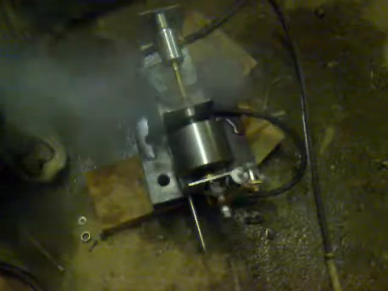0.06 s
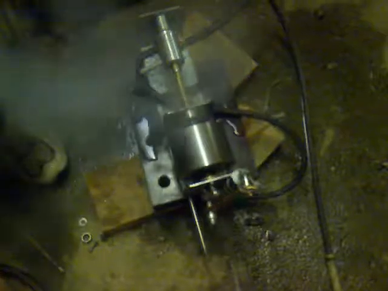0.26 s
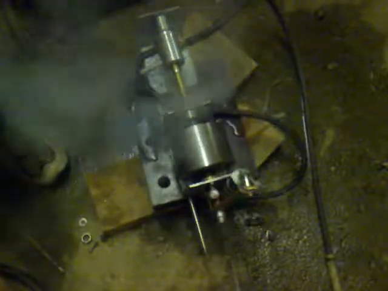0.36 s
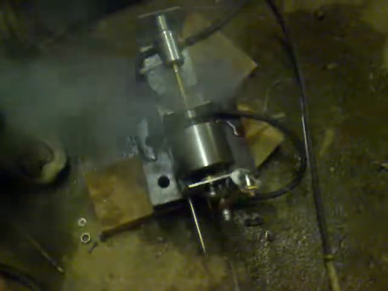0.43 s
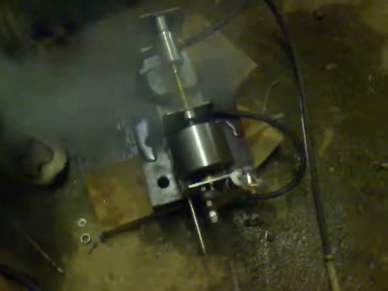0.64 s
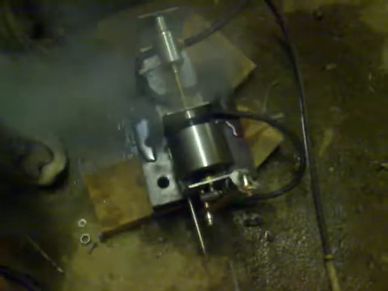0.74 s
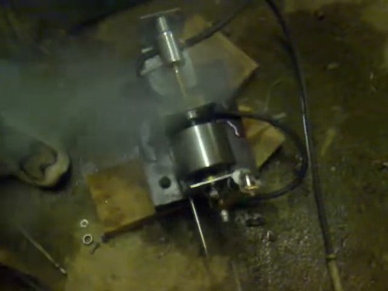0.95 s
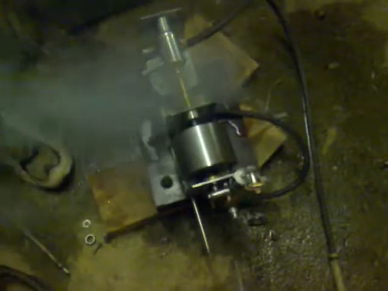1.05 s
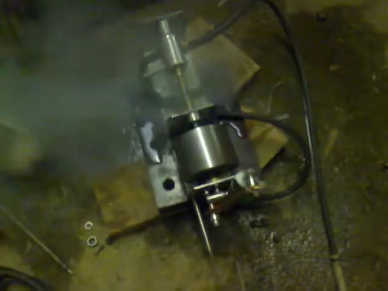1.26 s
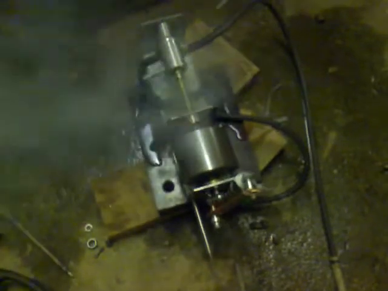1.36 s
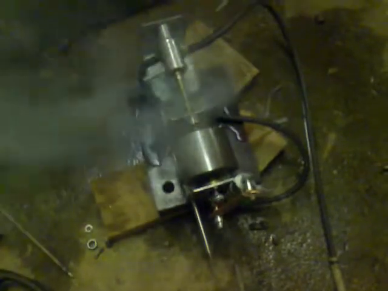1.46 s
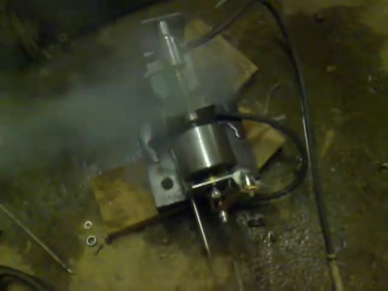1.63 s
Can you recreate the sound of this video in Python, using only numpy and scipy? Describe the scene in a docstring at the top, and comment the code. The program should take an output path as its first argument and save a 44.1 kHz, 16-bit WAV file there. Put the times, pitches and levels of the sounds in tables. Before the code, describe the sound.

A small steam engine turns over slowly, releasing three sharp, evenly spaced puffs of steam with a whistling edge. A thin leaking hiss and soft rod scuffs fill the gaps, heard close up in a slightly reverberant workshop.

```python
"""A small steam engine

A single cylinder turns over slowly on a workshop floor, heard in mono from close above. At each turn the
exhaust valve releases a sharp puff: a bright turbulent jet, a wavering whistle that sags as the pressure
falls, a low rush and a soft thump. The pipe sings on as the cylinder empties. Between puffs steam leaks
and the piston rod scuffs; the valve gear knocks once. A faint hum and the room's reverberation lie behind."""
import sys
import numpy as np
from scipy import signal
from scipy.fft import rfft, irfft
from scipy.io import wavfile

SR = 44100
rng = np.random.default_rng(int(sys.argv[2]) if len(sys.argv) > 2 else 0)


def master_out(mix):
    """Clip the mix to full scale and print it as 16-bit PCM to the path in sys.argv[1]."""
    frames = np.transpose(np.atleast_2d(mix))
    ceiling = np.clip(frames, -1, 1)
    pcm = np.round(ceiling * 32767).astype(np.int16)
    wavfile.write(sys.argv[1], SR, pcm)


N = 74970
T = np.arange(N) / SR

# The workshop's hum. Each row: time in seconds, pitch in Hz, level in dB.
HUM_COURSE = [(.1, 410, -69.5), (.42, 412, -61.5), (.62, 440, -61), (.72, 420, -58), (.84, 425, -50.5),
              (.92, 450, -54), (1.05, 425, -67), (1.2, 420, -64), (1.451, 412, -57), (1.55, 420, -76),
              (1.7, 430, -77)]
# Narrow resonances of the pipework. Each row: frequency in Hz, bandwidth in Hz, added gain.
PIPE_RESONANCES = [(435, 12, 0.23), (1950, 83, 0.34), (2730, 20, 0.55), (3325, 42, .7), (3340, 8.7, 0.31),
                   (3710, 36, 2.1), (4090, 30, 1.5), (4660, 16, 0.51), (5220, 49, 1.07), (5330, 15, 0.64),
                   (5980, 26, 1.2), (5960, 23, 0.33), (6220, 32, 0.89), (6085, 24, 1.1), (6500, 16, 1.6),
                   (6830, 29, 1.5), (7650, 68, 0.69), (8120, 27, 0.61), (9920, 60, 0.8), (11560, 85, 0.44)]
# Scuffs of the piston rod. Each row: centre in seconds, level in dB, half length in seconds.
ROD_SCUFFS = [(0.114, -35.5, 0.024), (.559, -34.5, 0.022), (1.04, -42, 0.027), (1.104, -38.5, 0.019),
              (1.571, -42, 0.03), (1.673, -42, 0.0094)]
# Exhaust puffs. Each row: start in seconds, level in dB, seconds until the valve closes,
# seconds until the return stroke ends, extra level of the low rush in dB.
EXHAUST_PUFFS = [(.2255, 0.55, 0.14, 0.357, 0.5), (.7205, -0.5, 0.15, 0.436, 1),
                 (1.2715, 0.74, 0.164, 0.46, 1)]
# Tones that steam draws from the pipe. Each row: frequency in Hz, relative level in dB.
PIPE_PARTIALS = [(3304, 1.5), (3435, -0.5), (3680, -3.5), (4095, -9.5)]
# Knocks of the valve gear. Each row: start in seconds, level in dB.
GEAR_KNOCKS = [(1.0425, -32)]
# Modes of the valve gear. Each row: frequency in Hz, relative level in dB, seconds to fall 60 dB.
GEAR_MODES = [(1920, -6.5, 0.13), (2410, -2, .10), (2590, 2, 0.03), (2950, -5, 0.016), (5260, -9, 0.075)]

# Spectra of the noise sources. Each row: frequency in Hz, relative spectral density in dB.
ROOM_SPECTRUM = [(20, -15), (60, -12), (120, -8), (180, -1), (280, 1), (360, -6), (600, -2), (1200, -5),
                 (3000, -14)]
LEAK_SPECTRUM = [(20, -22), (100, -33), (200, -14.5), (420, -29), (700, -12.5), (1500, -11), (2300, -1.5),
                 (3400, 6), (4200, 1.5), (4900, -4.5), (6200, 3), (7200, -5.5), (9500, -0.5), (12000, -5),
                 (13500, -4.5), (16000, -22)]
SCUFF_SPECTRUM = [(60, -51), (300, -8), (520, -3), (690, 10.5), (950, 1.5), (1400, 2), (2000, 4.5),
                  (3500, 3), (6000, 5.5), (8800, 9), (11000, -3), (15500, -7)]
SPIT_SPECTRUM = [(800, -23), (1700, -12), (2200, -5), (3400, 3), (4500, -6), (7000, -11), (9800, -4.5),
                 (12000, -5), (13500, 3), (16000, -6)]
JET_SPECTRUM = [(500, -22.5), (1600, -21), (2200, -10.5), (3400, -4.5), (4800, -0.5), (5400, 4.5),
                (6500, 1), (7200, 2), (7800, 1.5), (9000, -1.5), (10000, -2), (12200, -6.5), (13500, -4),
                (14000, -11), (16000, -16.5)]
RUSH_SPECTRUM = [(100, -37), (250, -12.5), (430, -2), (800, 0), (1300, 2), (2200, 1), (5000, -0.5),
                 (12000, -46)]
THUMP_SPECTRUM = [(20, -8), (45, -8), (75, 8), (130, -6), (250, -5), (600, -14)]
RETURN_SPECTRUM = [(150, -19), (300, -5), (700, -7.5), (1500, 0), (2200, 0.5), (3300, 7.5), (4900, 0.5),
                   (6100, 7.5), (7300, -1.5), (8800, 6), (10200, 3), (12000, -2), (13500, 1), (14200, -8),
                   (16000, -6.5)]
PIPE_SPECTRUM = [(300, -39), (1600, -21.5), (2100, -6), (2700, -4.5), (2950, -6), (3350, -9), (4100, -4.5),
                 (4900, -4.5), (6000, -6), (8000, -12.5), (15000, -15)]
AFTERBLOW_SPECTRUM = [(800, -17.5), (1700, -20), (2200, -6), (2700, 4), (2950, 1.5), (3350, 5),
                      (3900, -0.5), (4400, -1), (4900, -30), (7000, -22), (15000, -35)]
TAP_SPECTRUM = [(400, -28), (1200, -13), (1700, 1), (2450, 0), (3200, -8), (5000, -12), (10000, -25)]


def from_db(db):
    """Amplitude ratio for a level in decibels."""
    return 10 ** (np.asarray(db) / 20)


def unit_rms(x):
    """The signal scaled to an rms of 1."""
    return x / np.sqrt(np.mean(x ** 2) + 1e-20)


def drift(rate_hz):
    """Low-passed noise: a smooth random wander with an rms of 1."""
    pole = np.exp(-2 * np.pi * rate_hz / SR)
    return unit_rms(signal.lfilter([1], [1, -2 * pole, pole * pole], rng.standard_normal(2 * N))[N:])


def noise(spectrum, flutter_db=0, flutter_hz=60):
    """Spectrally shaped noise with random amplitude modulation, at an rms of 1."""
    hz, db = np.transpose(spectrum)
    bin_hz = np.arange(N // 2 + 1) * SR / N
    gain = from_db(np.interp(np.log(bin_hz + 1), np.log(hz), db))
    coloured = irfft(rfft(rng.standard_normal(N)) * gain, N)
    return unit_rms(coloured * from_db(flutter_db * drift(flutter_hz)))


def sine(hz):
    """A tone whose phase is the integral of its changing frequency."""
    return np.sin(2 * np.pi * np.cumsum(hz) / SR)


def swell(centre_s, half_s):
    """A Gaussian envelope with standard deviation half_s."""
    return np.exp(-0.5 * ((T - centre_s) / half_s) ** 2)


def flow(attack_s, hold_s, fall_db_per_s, close_db, rush=False):
    """Envelope of the puffs: flow rises, holds, decays with the pressure and drops as the valve shuts."""
    closing_s = 0.0048
    envelope = 0
    for start, db, open_s, _, rush_db in EXHAUST_PUFFS:
        age = T - start
        opened = np.exp(2 * np.minimum(age / attack_s - 1, 0)) * np.clip(1 + age / attack_s, 0, 1)
        fall_db = fall_db_per_s * np.maximum(age - attack_s - hold_s, 0)
        closed = np.clip((age - open_s) / closing_s, 0, 1)
        envelope += opened * from_db(db + rush * rush_db - fall_db - close_db * closed)
    return envelope


def emptying(fade_s=0.088):
    """Envelope of displacement: 1 while the cylinder empties, fading as each return stroke ends."""
    return sum((T > start) * np.clip((start + end_s - T) / fade_s + 0.5, 0, 1)
               for start, _, _, end_s, _ in EXHAUST_PUFFS)


def background():
    """The noise floor of the workshop: a faint wavering hum over low broadband noise."""
    times, hz, db = np.transpose(HUM_COURSE)
    hum = sine(np.interp(T, times, hz)) * from_db(np.interp(T, times, db) + 2 * drift(14))
    return hum + from_db(-58) * noise(ROOM_SPECTRUM, flutter_db=0.1, flutter_hz=9.2)


def leak(build_db=10, build_s=0.084):
    """Turbulence of steam seeping past the valve, strongest around each opening."""
    build = sum(np.exp(-np.abs(T - start) / build_s) for start, *_ in EXHAUST_PUFFS)
    return from_db(-41.5 + build_db * build) * noise(LEAK_SPECTRUM, flutter_db=2.4, flutter_hz=52)


def pipework(steam):
    """Resonance: each mode of the pipework reinforces a narrow band of the steam's sound."""
    coloured = steam
    for hz, width_hz, gain in PIPE_RESONANCES:
        radius = np.exp(-np.pi * width_hz / SR)
        feedback = [1, -2 * radius * np.cos(2 * np.pi * hz / SR), radius ** 2]
        band = (1 - radius ** 2) / 2 * signal.lfilter([1, 0, -1], feedback, steam)
        coloured = coloured + gain * band
    return coloured


def reverberation(direct, t60_s=0.36, delay_s=0.0044, cutoff_hz=6300):
    """Diffuse reflections in the workshop decay exponentially, a little duller than the direct sound."""
    tail = rng.standard_normal(N) * from_db(-60 * T / t60_s) * (T > delay_s)
    pole = np.exp(-2 * np.pi * cutoff_hz / SR)
    tail = signal.lfilter([1 - pole], [1, -pole], tail)
    return from_db(-12.5) * signal.fftconvolve(direct, tail / np.linalg.norm(tail))[:N]


def piston_rod():
    """Sliding friction of the wet rod makes soft swells of noise."""
    rubbing = sum(from_db(db) * swell(centre_s, half_s) for centre_s, db, half_s in ROD_SCUFFS)
    return rubbing * noise(SCUFF_SPECTRUM, flutter_db=2, flutter_hz=180)


def spit(lag_s=0.014):
    """Throttling: the first steam through the narrow valve gap makes a short, bright burst."""
    burst = sum(swell(start + lag_s, half_s=0.0057) for start, *_ in EXHAUST_PUFFS)
    return from_db(-19.5) * burst * noise(SPIT_SPECTRUM, flutter_db=1, flutter_hz=140)


def exhaust(spurt_lead_s=0.0093):
    """Turbulent discharge makes a bright jet and a low rush; the air it displaces thumps."""
    # The closing valve squeezes the jet into a last spurt.
    spurt = sum(swell(start + open_s - spurt_lead_s, half_s=0.012)
                for start, _, open_s, *_ in EXHAUST_PUFFS)
    jet_flow = flow(attack_s=0.012, hold_s=0.011, fall_db_per_s=175, close_db=9.2)
    rush_flow = flow(attack_s=0.017, hold_s=0.068, fall_db_per_s=63, close_db=10.3, rush=True)
    thump_flow = flow(attack_s=0.026, hold_s=0.016, fall_db_per_s=290, close_db=3.5)
    jet_envelope = from_db(-11) * jet_flow + from_db(-28.5) * spurt
    jet = jet_envelope * noise(JET_SPECTRUM, flutter_db=0.5, flutter_hz=100)
    rush = from_db(-30.5) * rush_flow * noise(RUSH_SPECTRUM, flutter_db=0.7)
    thump = from_db(-56) * (thump_flow + 0.43 * spurt) * noise(THUMP_SPECTRUM, flutter_db=7)
    return jet + rush + thump


def whistle(start_hz=6194, sag_hz_per_s=5500, waver_hz=380):
    """An unsteady edge tone at the exhaust port; its pitch sags as the pressure falls."""
    open_for_s = np.zeros(N)
    for start, _, open_s, *_ in EXHAUST_PUFFS:
        open_for_s = np.where(T >= start, np.minimum(T - start, open_s), open_for_s)
    hz = start_hz - sag_hz_per_s * open_for_s + waver_hz * drift(230)
    tone = sine(hz) * from_db(2.6 * drift(250))
    envelope = flow(attack_s=0.013, hold_s=0.048, fall_db_per_s=257, close_db=16)
    return from_db(-15) * envelope * unit_rms(tone)


def pipe_tones(puff_db=-33, idle_db=-54):
    """Flow excites faint, unsteady pipe tones that swell with each puff and idle on the leak."""
    tones = sum(from_db(db + 3.2 * drift(26)) * sine(hz + 14 * drift(43.4)) for hz, db in PIPE_PARTIALS)
    envelope = flow(attack_s=0.012, hold_s=0.05, fall_db_per_s=85, close_db=0.5)
    return (from_db(puff_db) * envelope + from_db(idle_db)) * tones


def return_stroke():
    """Displacement: the returning piston pushes out the remaining steam in a thin hiss."""
    return from_db(-37) * emptying() * noise(RETURN_SPECTRUM)


def pipe_flow(afterblow_lag_s=0.048):
    """Turbulent flow sounds hollow in the exhaust pipe and swells once more after the valve closes."""
    envelope = flow(attack_s=0.0021, hold_s=0.036, fall_db_per_s=65.7, close_db=0.21) * emptying()
    through = from_db(-24) * envelope * noise(PIPE_SPECTRUM, flutter_db=1.5, flutter_hz=140)
    afterblow = sum(swell(start + open_s + afterblow_lag_s, half_s=0.027)
                    for start, _, open_s, *_ in EXHAUST_PUFFS)
    return through + from_db(-32.5) * afterblow * noise(AFTERBLOW_SPECTRUM)


def valve_gear(tap_db=4.5, tap_t60_s=0.028):
    """Impact: a dry tap sets the damped modes of the valve gear ringing."""
    knock = 0
    for start, db in GEAR_KNOCKS:
        age = np.maximum(T - start, 0)
        contact = (T >= start) * from_db(db + tap_db - 60 * age / tap_t60_s)
        knock += contact * noise(TAP_SPECTRUM, flutter_db=2)
        for k, (hz, mode_db, t60_s) in enumerate(GEAR_MODES):
            knock += (-1) ** k * from_db(db + mode_db - 60 * age / t60_s) * np.sin(2 * np.pi * hz * age)
    return signal.sosfilt(signal.butter(2, 900, "high", fs=SR, output="sos"), knock)


def scene():
    """Superposition of the engine, its reflections and the background, alike in both channels."""
    steam = spit() + exhaust() + return_stroke() + whistle() + pipe_flow() + leak()
    engine = pipework(steam) + pipe_tones() + piston_rod() + valve_gear()
    return np.tile(engine + reverberation(engine) + background(), (2, 1))


def record(dry):
    """After a moment of silence, soft saturation rounds the peaks and a low-pass cuts the top treble."""
    start_s, ceiling, cutoff_hz = 0.0845, 0.82, 15850
    rounded = dry / (1 + (dry / ceiling) ** 4) ** (1 / 4)
    low_pass = signal.ellip(12, 0.2, 80, cutoff_hz, fs=SR, output="sos")
    return signal.sosfilt(low_pass, rounded * (T >= start_s))


dry = scene()
out = record(dry)
master_out(out)
```